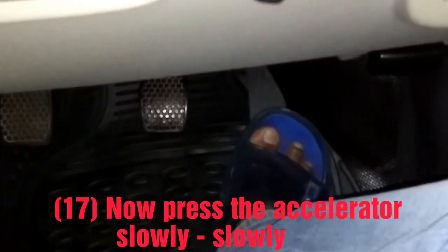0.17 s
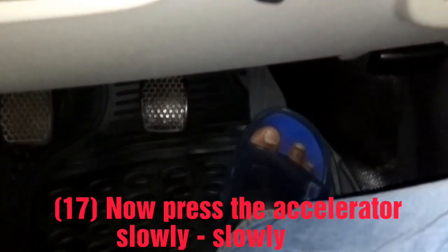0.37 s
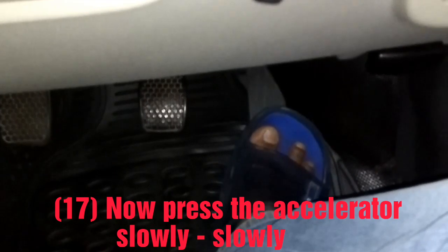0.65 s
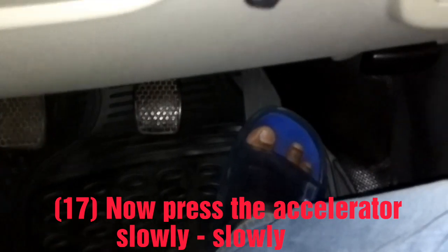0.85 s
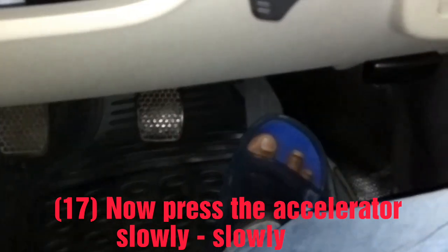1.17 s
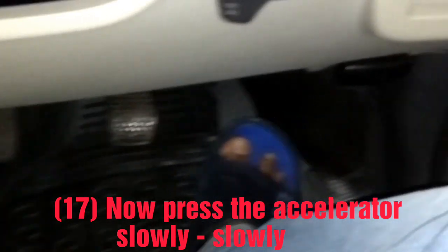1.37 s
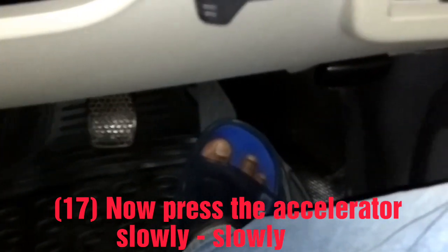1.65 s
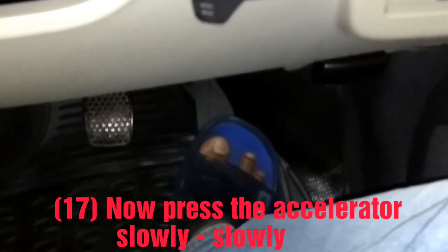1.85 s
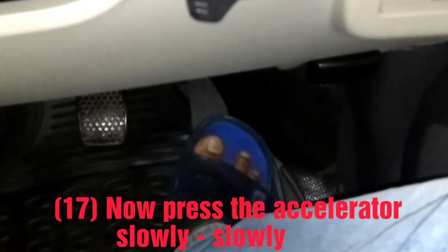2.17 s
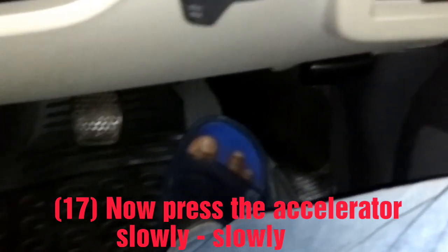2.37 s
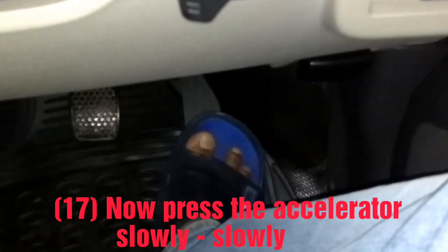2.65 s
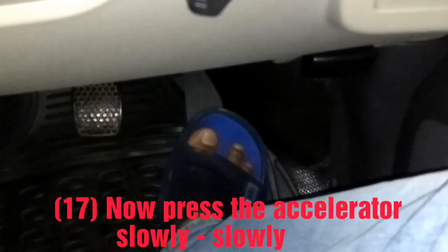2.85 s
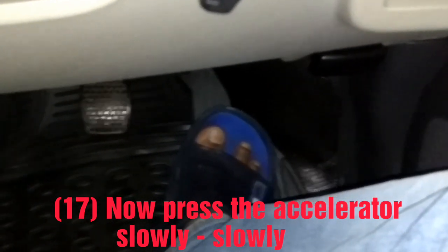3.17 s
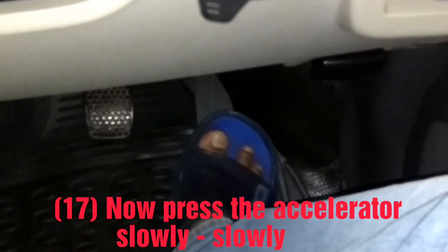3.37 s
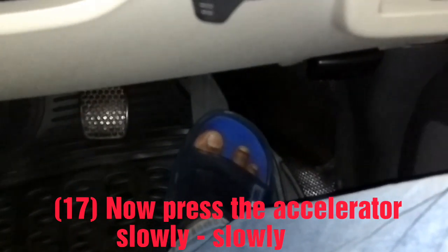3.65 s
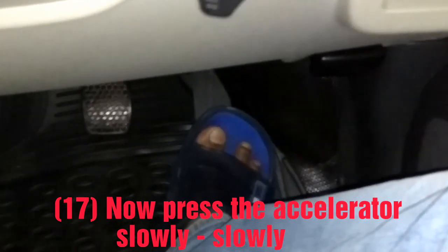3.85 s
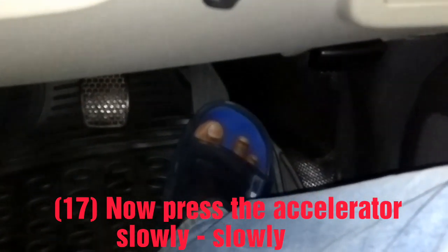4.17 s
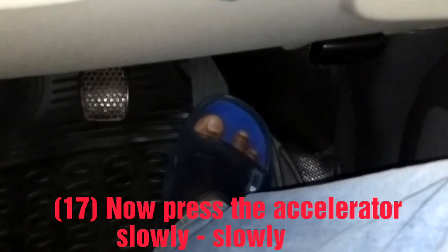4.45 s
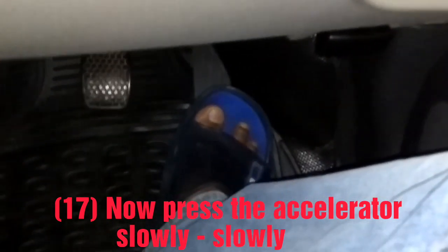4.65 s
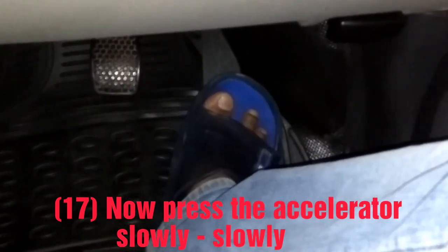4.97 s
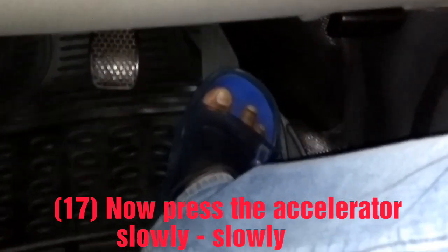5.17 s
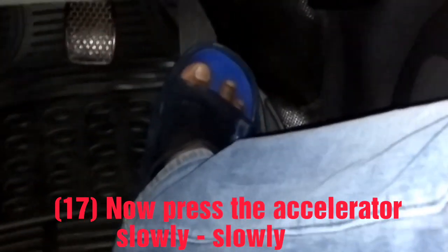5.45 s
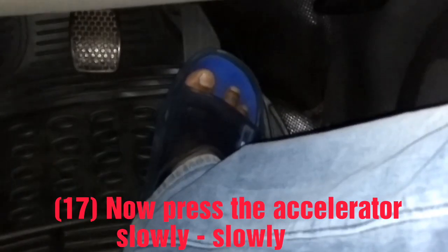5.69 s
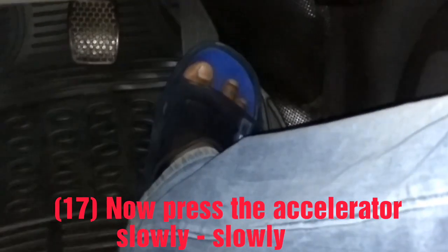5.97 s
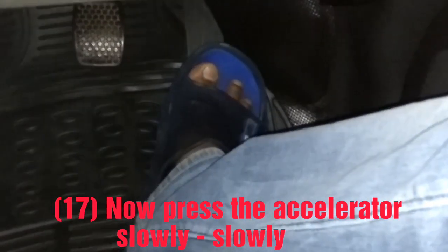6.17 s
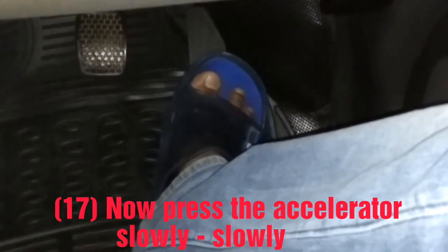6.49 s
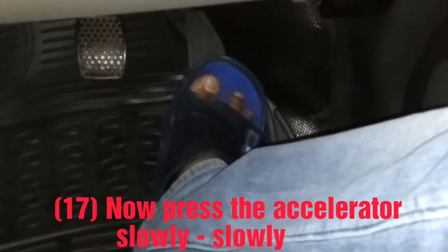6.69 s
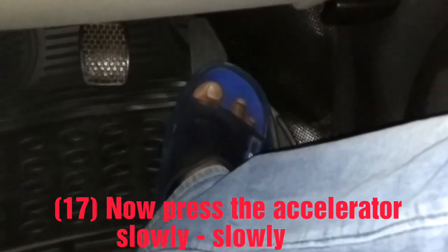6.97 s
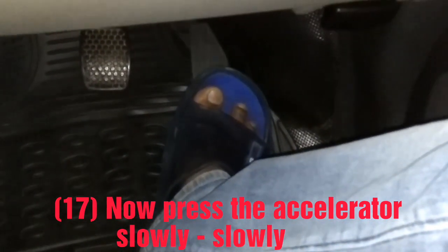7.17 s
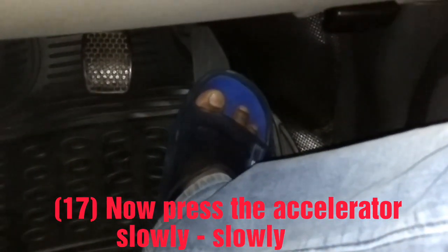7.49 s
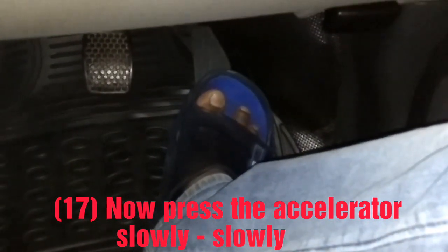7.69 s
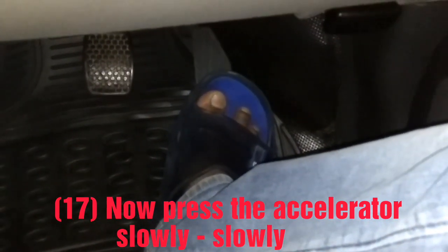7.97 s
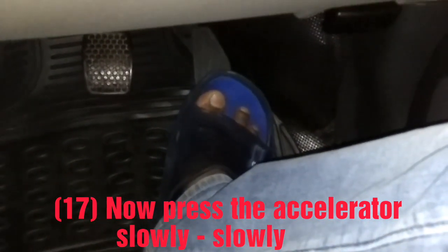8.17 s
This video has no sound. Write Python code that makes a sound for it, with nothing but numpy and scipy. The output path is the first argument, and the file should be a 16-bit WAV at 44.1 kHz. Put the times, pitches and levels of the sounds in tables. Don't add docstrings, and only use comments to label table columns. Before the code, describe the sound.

A small three-cylinder engine is heard from the footwell of a closed car, mostly deep boom and soft combustion roar, over faint steady electric hum and light hiss. It starts at idle, and a gentle rev climbs from about 0.2 to 0.9 s, doubling its pitch. It falls by 1.6 s, lifts slightly around 2.4 s, then slides to a low idle by 4 s. A second rev rises from about 6.8 s and is still high at the end, 8.3 s. Close on the left, hand and denim rustle, strongest near 1.2 s, with lighter strokes until 4 s. A dull scuff comes at 0.9 s, a small plastic click at 1.67 s, a bright sharp tick at 4.71 s, and a hollow, lower plastic knock at 5.3 s. Rubber sole scuffs and cloth drags cluster from 4.9 to 5.7 s; afterwards rubbing nearly stops.

```python
import sys
import numpy as np
from scipy import signal
from scipy.fft import rfft, irfft, next_fast_len
from scipy.io import wavfile
from scipy.ndimage import uniform_filter1d

SR = 44100
rng = np.random.default_rng(int(sys.argv[2]) if len(sys.argv) > 2 else 0)


def pcm_store(signal):
    levels = np.round(np.clip(np.atleast_2d(signal), -1, 1) * 32767)
    wavfile.write(sys.argv[1], SR, levels.astype(np.int16).T)


def boost_factor(decibels):
    exponent = np.asarray(decibels, float) / 20
    return 10 ** exponent


N = 367352

# frequency in Hz, density in dB per Hz.
HISS = [(1760, -17), (3000, -16), (4080, -5.5), (5250, -12), (6350, -5), (8170, -5), (12100, -7),
        (14500, -4.5), (15300, -50.5)]
HISS_DB = -77
# frequency in Hz, correlation from 0 to 1.
LIKENESS = [(30, .998), (60, .995), (130, .98), (290, .83), (640, .55), (1200, .02), (15000, .04)]
# frequency in Hz, lead in radians.
RIGHT_LEAD = [(25, .06), (100, .1), (180, 0), (290, .25), (450, .5), (800, .2), (1500, 0)]
# frequency in Hz, left minus right in dB.
CABIN_SIDE = [(25, 0.5), (100, 1.5), (300, 1.5), (420, 1), (770, -2), (1200, 1), (2400, 4.5), (15000, 2.5)]
# frequency in Hz, level in dB.
PUMP = [(59.5, -50), (86.4, -51), (172.6, -56)]

# start in seconds, peak in dB, frequency in Hz, t60 in seconds,
# left minus right in dB.
RINGS = [(1.6708, -37.5, 1350, .006, 16), (1.6705, -41, 430, .02, 10), (1.6706, -43, 620, .014, 10),
         (1.6708, -43, 900, .008, 14), (1.671, -43, 3050, .006, 14), (4.711, -43, 9500, .0025, 16),
         (4.7112, -40, 13300, .003, 10), (4.874, -52, 600, .02, 0), (5.303, -39, 318, .09, 3),
         (5.3, -31, 180, .09, 4), (5.301, -49, 505, .07, 3), (5.301, -49, 625, .06, 3),
         (5.3, -42, 1150, .03, 12), (5.3005, -44, 1450, .025, 12), (5.304, -47, 2200, .025, 12),
         (5.302, -42, 410, .07, 0), (5.301, -45, 770, .04, 2), (7.492, -52, 500, .02, 0),
         (7.678, -52, 500, .02, 0)]
# start in seconds, peak in dB, low edge in Hz, t60 in seconds,
# left minus right in dB.
CRACKS = [(0.914, -54, 80, 0.062, 11), (1.668, -43.5, 80, .06, 13), (1.6713, -45.5, 1590, 0.0094, -9),
          (1.6714, -43, 404, 0.013, 4), (1.678, -56, 775, 0.2, 3), (4.165, -69.5, 8200, 0.11, 18),
          (4.635, -66.5, 890, 0.14, 10), (4.688, -66, 890, 0.14, 12), (4.706, -62.5, 1600, 0.15, 10),
          (4.711, -43.5, 6500, 0.0066, 21.5), (5.2986, -45.5, 497, 0.1, 4.5),
          (5.3012, -46, 2700, 0.04, 8.5), (5.31, -52, 450, 0.092, 1), (6.16, -68.5, 900, 0.015, -1),
          (6.298, -72, 900, 0.015, -1)]
CRACK_SPAN, CRACK_TOP_HZ = 5, 14000
# middle in seconds, length in seconds, level in dB, frequency in Hz.
SCUFFS = [(0.909, 0.22, -69, 1220), (4.909, 0.016, -59, 790), (4.94, 0.019, -79, 1300),
          (4.966, 0.047, -67, 2130), (5.047, 0.019, -63, 1400), (5.357, 0.041, -61.5, 2860),
          (5.15, 0.11, -65, 2450), (5.213, 0.082, -66, 1480), (5.284, 0.11, -63, 2730),
          (5.39, 0.022, -62, 1580), (5.494, 0.029, -62.5, 1290), (5.552, 0.026, -58.5, 1660),
          (5.601, 0.061, -60, 1400), (5.638, 0.3, -68.5, 1540)]

# frequency in Hz, density in dB per Hz.
CLOTH = [(2240, -30), (3800, -11.5), (5460, -6.5), (6090, -6), (7230, -5.5), (8640, -3), (11000, 3),
         (13400, 1), (15000, -10)]
# frequency in Hz, left minus right in dB.
CLOTH_SIDE = [(60, -13), (110, -2.5), (200, 1), (380, 15.5), (700, 0), (1290, 2), (2380, 2), (4390, 15),
              (8100, 12.5), (15000, 1)]
# strongest moment in seconds, swell in seconds, fade in seconds,
# level in dB, left minus right in dB.
STROKES = [(0.952, 0.16, 0.56, -61.5, 2), (1.242, 0.38, 0.093, -53.5, 10.5), (1.47, 0.13, 0.22, -63, 10.5),
           (1.68, 0.043, 0.024, -61.5, 16), (1.76, 0.13, 0.15, -61.5, 11), (2.001, 0.13, 0.28, -66.5, 11.5),
           (2.228, 0.13, 0.16, -63, 8.5), (2.558, 0.22, 0.14, -64, 8.5), (2.88, 0.092, 0.098, -65.5, 10),
           (3.14, 0.092, 0.077, -71.5, 9), (3.601, 0.23, 0.45, -67, 8), (3.839, .2, 0.11, -63, 18.5),
           (4.59, 0.04, 0.05, -70, 15), (4.65, 0.04, 0.065, -62.5, 25), (4.69, 0.036, 0.11, -61, 22),
           (4.79, 0.14, 0.17, -66, 10), (5.28, 0.41, 0.14, -59, 8), (5.42, 0.22, 0.22, -61.5, 9.5),
           (5.66, 0.24, 0.084, -64, 12.5), (5.98, 0.9, 0.14, -68.5, 15.5), (6.38, .04, 0.051, -78, 20),
           (7.4, 0.21, 0.077, -87.5, 3), (8.3, 0.44, .2, -76, 8)]
# strongest moment in seconds, swell in seconds, #
# fade in seconds, level in dB, left minus right in dB (unused: the drags take the cabin's balance).
DRAGS = [(0.904, 0.014, 0.0047, -55.5, 8), (1.221, 0.059, 0.15, -62, 8), (1.45, 0.17, 0.14, -67, 8),
         (2.271, 0.037, 0.033, -64, 8), (2.55, 0.17, 0.058, -69, 8), (3.69, 0.05, 0.06, -64.5, 8),
         (4.61, .02, 0.017, -65.5, 8), (4.705, .04, 0.043, -61.5, 8), (4.92, 0.19, 0.08, -71.5, 8),
         (5.3, 0.041, .04, -61, 8), (5.328, 0.3, 0.39, -63, 8)]
# frequency in Hz, density in dB per Hz.
MAT = [(500, -28.5), (1000, -2), (1500, -3), (2500, -5.5), (4000, -8), (7000, -21.5)]
STROKE_ENDS_DB, STROKE_EDGE_S = -7.5, 0.066
RESTING_DB, RESTING_SIDE_DB = -77, 4.5
STICK_S, LET_GO_S = 4.697, 4.7045

# time in seconds, firings per second.
SPEED = [(0, 20.4), (.21, 21.6), (.6, 36.6), (.8, 42.8), (.97, 43), (1.24, 33.8), (1.56, 28.1),
         (1.85, 28.4), (2.36, 31.1), (2.9, 27.1), (3.97, 22.2), (4.8, 21.8), (5.52, 20.6), (6.72, 20.7),
         (7.17, 27.6), (7.56, 31.6), (7.9, 33.3), (8.33, 34.2)]
IDLE_PER_S, PULL_PER_S2 = 21, 12
# frequency in Hz, level in dB.
CABIN = [(12, -49), (40, -40.5), (60, -58), (78, -57.5), (102, -51.5), (122, -58.5), (145, -65),
         (198, -60.5), (232, -74.5), (300, -66), (385, -73.5), (470, -85), (615, -85), (760, -95.5)]
# frequency in Hz, density in dB per Hz.
UPPER = [(330, -21), (560, -3), (612, 0.5), (676, -6), (769, -8), (1480, -13), (2180, -15.5), (2360, -17.5),
         (3240, -16.5), (6000, -27.5), (7800, -57), (13200, -120)]
ROAR_DB, ROAR_PER_SPEED_DB, ROAR_PULL_DB = -44.5, 0.3234, -5
UPPER_DB, UPPER_PER_SPEED_DB, UPPER_PULL_DB = -67.5, 0.3164, 0.5

# multiple of the full engine cycle, level in dB.
LOW_ORDERS = [(1, -9.5), (4, -8.5), (5, 0.5), (7, -3.5), (8, -5.5), (11, -6.5), (12, -2.5), (13, -11),
              (14, -1.5), (16, 0), (18, 2.5), (21, 4), (24, 3), (27, 3), (30, 3), (36, 4.5), (42, 4)]
# frequency in Hz, level in dB.
IMBALANCE = [(13.6, -25.5), (15, -38.5), (16.5, -48.5), (19, -27), (21.5, -48), (23, -28.5), (25, -31),
             (28, -29)]
BOOM = [(20.5, -25), (21.7, -25.5), (22.5, -22), (24, -24.5), (26.5, -24.5), (28.5, -27.5), (31, -27.5),
        (34, -35.5), (37.5, -27), (41, -25), (43, -32)]
SECOND = [(41, -48.5), (44, -42), (50, -44.5), (56, -48), (60, -39), (64, -45), (68, -45), (82, -45)]
THIRD = [(62, -46.5), (72, -54.5), (84, -53), (102, -47), (112, -53), (122, -57), (130, -53)]
TENTH = [(70, -58), (90, -54), (96, -42), (101, -39), (104, -40), (108, -54), (120, -60), (142, -80)]
FIFTH = [(102.5, -39), (106, -45), (110, -46.5), (118, -68.5), (140, -54), (172, -67.5), (198, -56.5),
         (215, -66)]
WHINE = [(315, -61), (350, -66), (400, -65), (430, -77), (500, -78), (560, -69.5), (620, -64), (660, -67.5)]
PULL_DB = [-1, 2, 6, 7, 1.5, 6, 0]
STEP = 20
FIRING_DB, OFF_FIRING_DB = 2.5, -5.5
WANDER_DB, BEAT_DB = 2.8, 0.8
ORDERS_PER_SPEED_DB, ORDERS_PULL_DB = 0.4766, 2
RAGGED_PER_S, RAGGED = 35, 0.035
BROKEN_DB, LOST_DB = 5, -2.5
TENTH_LAG_S, TENTH_LOST_DB = 0.18, -7
BODY_HZ, BODY_WIDTH_HZ, BODY_DB = 25.9, 3.68, 5
# frequency in Hz, width in Hz, gain in dB.
PANELS = [(166.2, 6.8, -7), (194.7, 6, 4.5), (224.5, 4.3, -6.5), (253.8, 16, 5), (268, 11, -1.5),
          (360, 5.7, 1.5), (452, 40, 0.5), (497.6, 12, 3), (585, 23, -4), (610.7, 10, 6), (638, 13, -5.5),
          (2280, 47, 0.5)]

# low edge in Hz, high edge in Hz, weakness in standard deviations.
THIN_BANDS = [(520, 690, -2.5), (690, 860, -.9), (860, 1030, -1.4), (1030, 1200, -.6), (1200, 1380, -.6),
              (1380, 1550, -.1), (1550, 1720, .5), (1720, 1890, .7), (1890, 2070, 1.2), (2070, 2330, -.1),
              (2330, 2580, .6), (2580, 2840, .7), (2840, 3100, 1.3), (3100, 3450, -.2), (3450, 3790, .5),
              (3790, 4130, 0), (4130, 4480, -.6), (4480, 5000, -1.2), (5500, 6000, -1.4),
              (6500, 7000, -1.4)]
# low edge in Hz, high edge in Hz, least level kept in dB.
TOP_BANDS = [(12800, 13500, -96.5), (13500, 14250, -96.5), (14250, 22050, -95.5)]
# frequency in Hz, share of the neighbours' rms.
WEAKEST_KEPT = [(600, 0), (1400, .6), (3000, .85), (7000, .8), (9500, .6), (12000, .8), (13000, 1.15),
                (14500, 1.3)]


def evened(x):
    return x / np.sqrt(np.mean(x ** 2) + 1e-20)


def read(points, hz):
    f, value = np.transpose(points)
    return np.interp(np.log(hz + 1), np.log(f + 1), value)


def drift(t, per_s, count):
    knots = np.arange(0, t[-1] + 1, 1 / per_s)
    values = 2.0 * rng.standard_normal((count, 400))[:, :len(knots)]
    return np.array([np.interp(t, knots, v) for v in values])


def noise(shape, size, patchy_db, side, likeness=0.94):
    frames, hz = N * 4 // size + 5, np.fft.rfftfreq(size, 1 / SR)
    a, b, c, d, patches = rng.standard_normal((frames, len(hz), 5)).T
    patches = uniform_filter1d(patches, size=8, axis=0)
    patches = evened(uniform_filter1d(patches, size=8, axis=1))
    same = np.clip(likeness * read(LIKENESS, hz), 0, 1)[:, None]
    left = a + 1j * b
    right = same * left + np.sqrt(1 - same ** 2) * (c + 1j * d)
    right = right * np.exp(1j * read(RIGHT_LEAD, hz))[:, None]
    balance_db = np.outer([.5, -.5], read(side, hz))[..., None]
    z = np.array([left, right]) * boost_factor(read(shape, hz)[:, None] + patchy_db * patches + balance_db)
    out = signal.istft(z, nperseg=size, noverlap=size * 3 // 4)[1][:, :N]
    return out / np.sqrt(np.mean(out.mean(0) ** 2))


def burst(low_hz, high_hz):
    band = signal.butter(2, [low_hz, min(high_hz, .45 * SR)], "band", fs=SR, output="sos")
    return evened(signal.sosfilt(band, rng.standard_normal((2, 9000)))[:, 1000:])


def hiss():
    return boost_factor(HISS_DB) * noise(HISS, size=1024, patchy_db=1.5, side=CABIN_SIDE, likeness=.3)


def pump(t):
    wobble = drift(t, 3.0, count=len(PUMP))
    return sum(np.sqrt(2) * boost_factor(db + 0.5 * w) * np.cos(2 * np.pi * f * t)
               for (f, db), w in zip(PUMP, wobble))


def clicks():
    out, t = np.zeros((2, N)), np.arange(8000) / SR
    half = np.array([[.5], [-.5]])
    for s, db, hz, t60, pan_db in RINGS:
        at = round(s * SR)
        decay = boost_factor(db + half * pan_db - 60 * t / t60)
        onset = np.minimum(hz * t, 1)
        out[:, at:at + len(t)] += decay * onset * np.sin(2 * np.pi * hz * t)
    for s, db, low_hz, t60, pan_db in CRACKS:
        at = round(s * SR)
        decay = boost_factor(db + half * pan_db - 60 * t / t60)
        out[:, at:at + len(t)] += decay * burst(low_hz, min(CRACK_SPAN * low_hz, CRACK_TOP_HZ))
    for s, length, db, hz in SCUFFS:
        at = round(s * SR) - len(t) // 2
        slips = np.repeat(boost_factor(3.0 * rng.standard_normal(40)), 200)
        grip = evened(uniform_filter1d(slips, size=100))
        swell = np.exp(-((t - t.mean()) / (.5 * length)) ** 2)
        out[:, at:at + len(t)] += boost_factor(db) * burst(0.84 * hz, 1.18 * hz) * grip * swell
    return out


def rubbing(t, strokes, resting_db, side_share):
    power = boost_factor(2 * (resting_db + side_share * (RESTING_SIDE_DB - 8.0))) * np.ones(len(t))
    for top, swell, fade, db, pan_db in strokes:
        away = np.where(t < top, (top - t) / swell, (t - top) / fade)
        inside_s = np.minimum(t - top + swell, top + fade - t)
        touch = np.clip(inside_s / STROKE_EDGE_S + .5, 0, 1)
        power = power + (touch * boost_factor(db + STROKE_ENDS_DB * away + side_share * (pan_db - 9))) ** 2
    return np.sqrt(power)


def rustle(t):
    grains = boost_factor(0.75 * np.repeat(rng.exponential(1, N // 40 + 1), 40)[:N])
    rub = noise(CLOTH, size=256, patchy_db=1.0, side=CLOTH_SIDE, likeness=0.12)
    rub = rub * np.clip(np.maximum(STICK_S - t, t - LET_GO_S) / .002, .1, 1)
    mat = noise(MAT, size=256, patchy_db=3.0, side=CABIN_SIDE, likeness=.3)
    drag = rubbing(t, DRAGS, -100, 0) * mat
    pressure = np.array([rubbing(t, STROKES, RESTING_DB, share) for share in (0.32, -1.2)])
    return drag + pressure * rub * evened(uniform_filter1d(grains, size=30))


def engine(t):
    fine = np.arange(-.5, 9, .005)
    at_s, per_s = np.transpose(SPEED)
    speed = uniform_filter1d(np.interp(fine, at_s, per_s), size=16)
    pull = np.tanh(uniform_filter1d(np.gradient(speed, fine), size=30) / PULL_PER_S2)
    return np.interp(t, fine, speed), np.interp(t, fine, pull)


def roar(t):
    speed, pull = engine(t)
    low_db = ROAR_PER_SPEED_DB * speed + ROAR_PULL_DB * pull
    modes = noise(list(CABIN) + [(1000, -120)], size=4096, patchy_db=1.5, side=CABIN_SIDE)
    rumble = boost_factor(ROAR_DB + low_db - low_db.mean()) * modes
    upper = boost_factor(UPPER_DB + UPPER_PER_SPEED_DB * (speed - IDLE_PER_S) + UPPER_PULL_DB * pull)
    return rumble + upper * noise(UPPER, size=1024, patchy_db=1.5, side=CABIN_SIDE)


def order_levels(k, hz, speed, pull, late_pull, unrest):
    rule_db = np.where(k % 3 == 0, FIRING_DB, OFF_FIRING_DB).astype(float)
    for multiple, db in LOW_ORDERS:
        rule_db[round(multiple) - 1] = db
    load_db = ORDERS_PER_SPEED_DB * speed + ORDERS_PULL_DB * pull
    wander_db = WANDER_DB * np.minimum(drift(t=order_times(), per_s=4., count=len(k)), 1.3)
    level_db = read(CABIN, hz) + rule_db[:, None] + load_db - load_db.mean() + wander_db
    uneven = drift(order_times(), 9., count=46)
    answers = (IMBALANCE, BOOM, SECOND, THIRD, TENTH, FIFTH, WHINE)
    for multiple, answer, pull_db in zip((2, 3, 6, 9, 10, 15, 46), answers, PULL_DB):
        row = multiple - 1
        level_db[row] = read(answer, hz[row]) + pull_db * pull + BEAT_DB * uneven[row]
    flutter_db = BROKEN_DB * np.minimum(drift(order_times(), 16., count=len(k)), 1)
    level_db += unrest * np.clip(k[:, None] / 9 - 1, 0, 1) * (LOST_DB + flutter_db)
    level_db[9] += TENTH_LOST_DB * late_pull ** 2
    return level_db


def order_times():
    return np.arange(-600, N // STEP + 100) * STEP / SR


def orders():
    t = order_times()
    speed, pull = engine(t)
    late_speed, late_pull = engine(t - TENTH_LAG_S)
    k = np.arange(1, 91)
    hz = k[:, None] * speed / 3
    hz[9] = 10 * late_speed / 3
    unrest = np.clip(np.maximum(abs(pull), (speed - RAGGED_PER_S) / 6), 0, 1) ** 2
    level_db = order_levels(k, hz, speed, pull, late_pull, unrest)
    angle = 2 * np.pi * (np.cumsum(hz, 1) * STEP / SR + rng.random((len(k), 1)))
    angle += (.00025 * k[:, None] + RAGGED * unrest) * k[:, None] * drift(t, 9., count=1)
    spread = np.arccos(np.clip(read(LIKENESS, hz), 0, 1))
    slip = spread * rng.uniform(-1.6, 1.6, (len(k), 1)) - read(RIGHT_LEAD, hz)
    size, tilt = np.sqrt(2) * boost_factor(level_db), boost_factor(read(CABIN_SIDE, hz) / 2)
    left = (size * tilt * np.cos(angle)).sum(0)
    right = (size / tilt * np.cos(angle - slip)).sum(0)
    pair = np.array([left, right])
    shell = signal.iirpeak(BODY_HZ, BODY_HZ / BODY_WIDTH_HZ, SR / STEP)
    pair = pair + boost_factor(BODY_DB) * signal.lfilter(*shell, pair) + pump(t)
    return signal.resample_poly(pair, STEP, 1, axis=1)[:, 600 * STEP:][:, :N]


def footwell(x):
    size = next_fast_len(N)
    hz = np.fft.rfftfreq(size, 1 / SR)
    gain_db = sum(db / (1 + (2 * (hz - f) / width) ** 2) for f, width, db in PANELS)
    return irfft(rfft(x, size) * boost_factor(gain_db), size)[:, :N]


def scene():
    t = np.arange(N) / SR
    return hiss() + clicks() + rustle(t) + footwell(roar(t) + orders())


def band_db(z, rows):
    power = (abs(z[:, rows]) ** 2).mean(1)
    return 10 * np.log10(uniform_filter1d(power, size=6) + 1e-20)


def low_pass(x):
    return signal.sosfilt(signal.butter(12, 15160, fs=SR, output="sos"), x)


def record(dry):
    hz, _, z = signal.stft(dry, SR, nperseg=1024, noverlap=768, boundary="odd")
    treble_db = band_db(z, (hz >= 6000) & (hz < 14000))
    busy = (np.minimum(treble_db, -71) + np.array([[86], [84.5]])) / 6
    luck = rng.standard_normal((28, 2, z.shape[2] // 8 + 1))
    luck = np.repeat(luck, 8, axis=2)[..., :z.shape[2]]
    for (low, high, weakness), chance in zip(THIN_BANDS, luck):
        rows = (hz >= low) & (hz < high)
        level_db = band_db(z, rows)
        strong = (level_db - np.median(level_db)) / 5
        kept = busy + weakness - strong + .75 * chance + .65 * luck[-1] < 0
        z[:, rows] *= kept[:, None] + .01
    for (low, high, least_db), chance in zip(TOP_BANDS, luck[-6:]):
        rows = (hz >= low) & (hz < high)
        z[:, rows] *= (band_db(z, rows) + 2 * chance > least_db)[:, None]
    near = uniform_filter1d(abs(z) ** 2, size=9, axis=1)
    near = np.sqrt(abs(uniform_filter1d(near, size=5, axis=2)))
    z *= abs(z) > read(WEAKEST_KEPT, hz)[:, None] * near
    thinned = signal.istft(z, SR, nperseg=1024, noverlap=768)[1][:, :N]
    return low_pass(thinned)


dry = scene()
out = record(dry)
pcm_store(out)
```